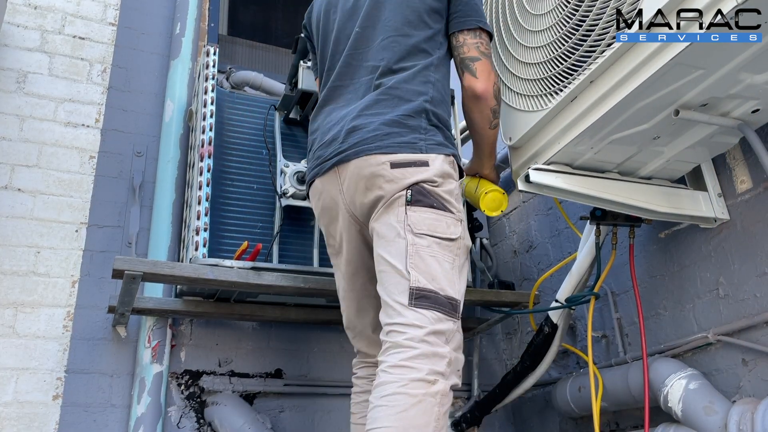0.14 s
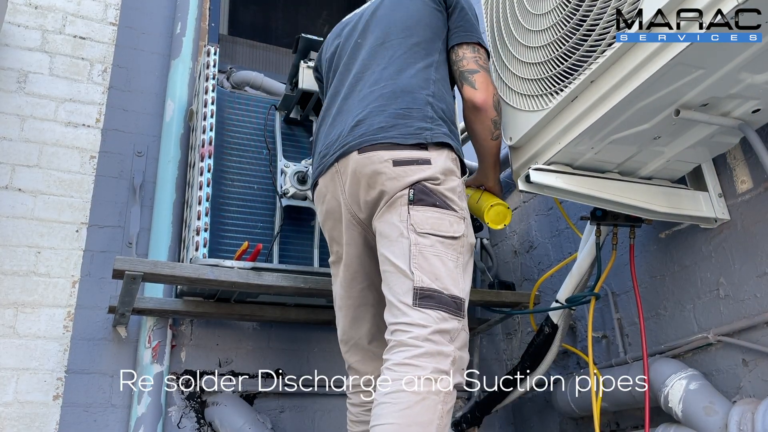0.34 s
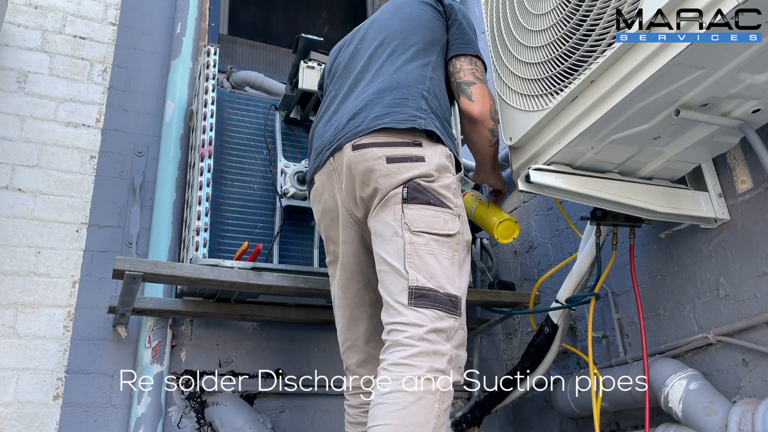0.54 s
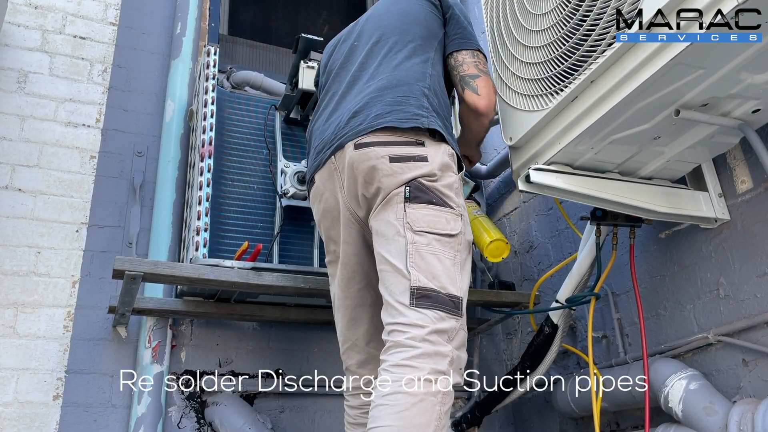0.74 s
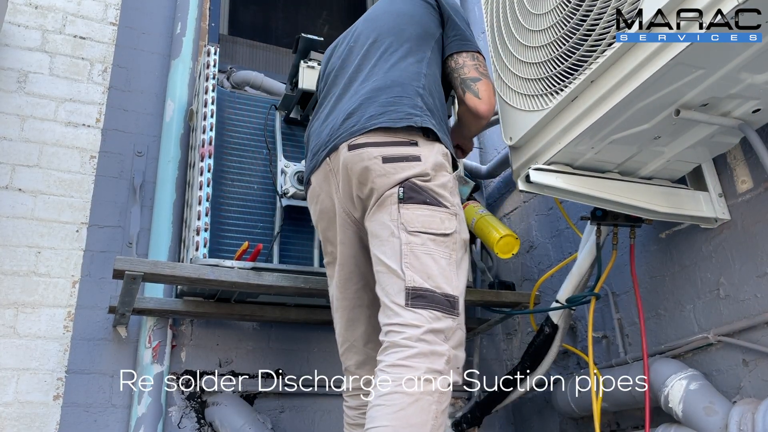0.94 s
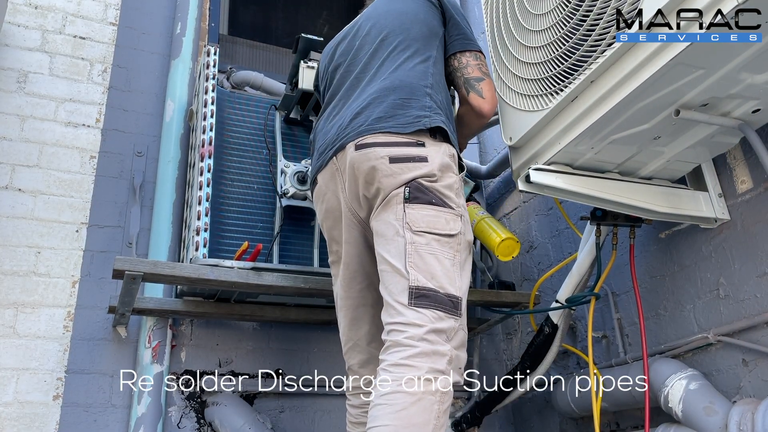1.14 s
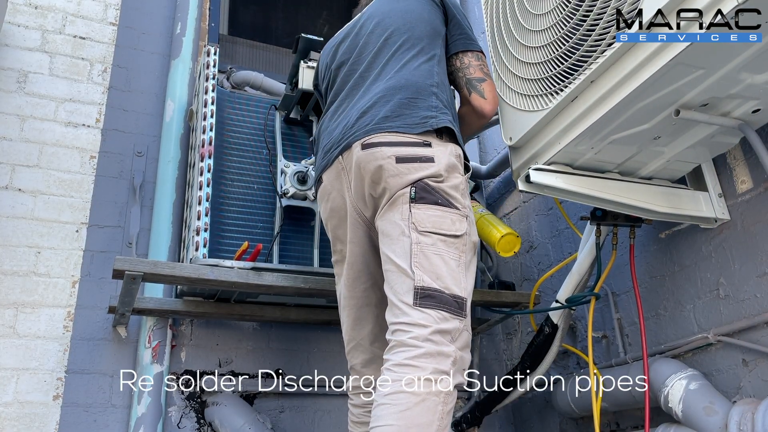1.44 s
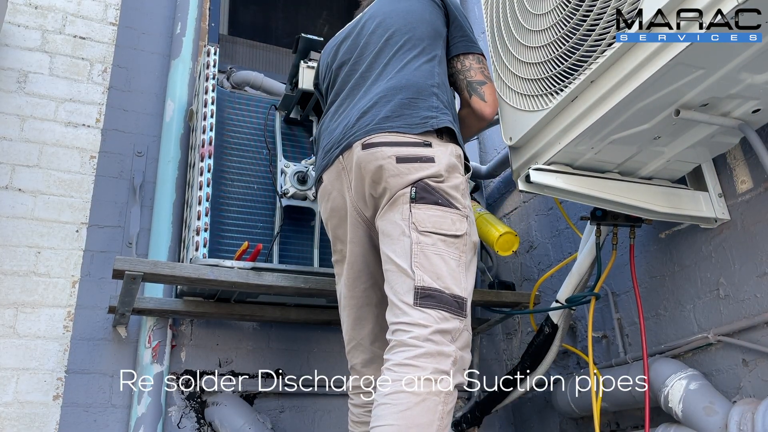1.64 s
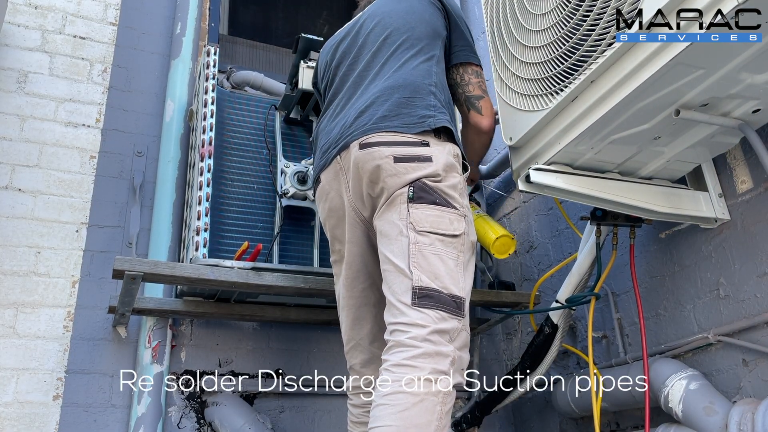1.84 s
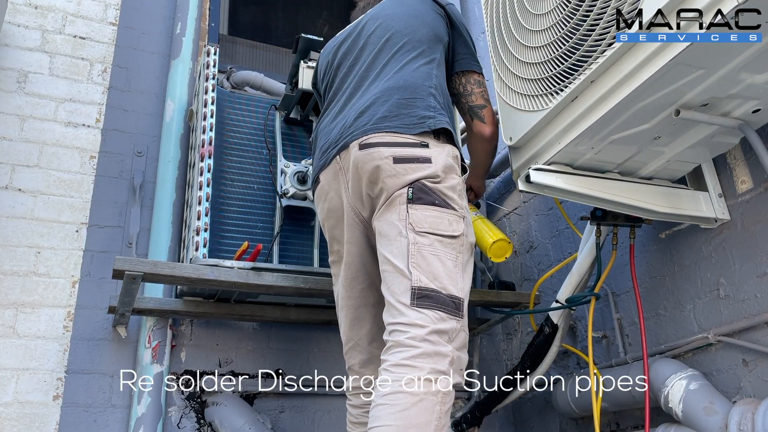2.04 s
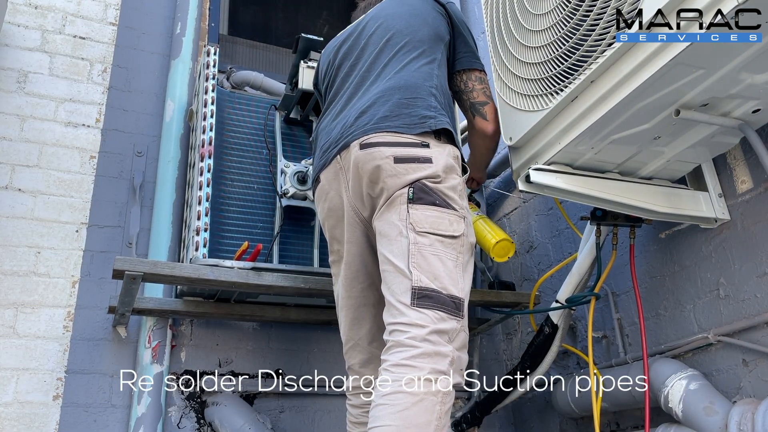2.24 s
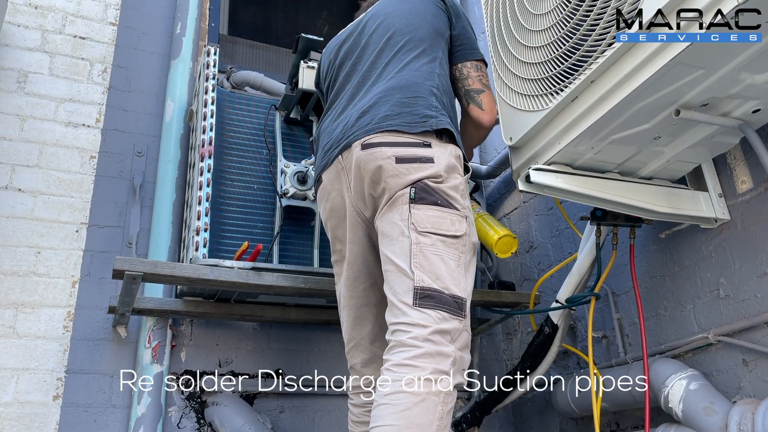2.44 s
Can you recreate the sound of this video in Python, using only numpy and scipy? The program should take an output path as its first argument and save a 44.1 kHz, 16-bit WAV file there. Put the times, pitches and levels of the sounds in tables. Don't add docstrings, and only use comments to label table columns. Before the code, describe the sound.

A handheld gas torch clacks, hisses, pops alight, cuts out, then relights to a steady roar.

```python
import sys
import numpy as np
from scipy import signal
from scipy.fft import rfft, irfft, next_fast_len
from scipy.io import wavfile
from scipy.ndimage import uniform_filter1d, map_coordinates

SR = 44100
rng = np.random.default_rng(int(sys.argv[2]) if len(sys.argv) > 2 else 0)


def nominal_scale(level):
    x = np.asarray(level, float) / 20
    return 10 ** x


def master(y):
    cut = np.clip(np.atleast_2d(y).T, -1, 1)
    pcm = np.round(cut * 32767)
    wavfile.write(sys.argv[1], SR, pcm.astype(np.int16))


N = 114660


def unit(x):
    return x / np.sqrt(np.mean(x ** 2) + 1e-20)


def along(points, hz):
    point_hz, values = np.transpose(points)
    return np.interp(np.log(hz + 1), np.log(point_hz + 1), values)


def curve(rows):
    return np.interp(np.arange(N) / SR, *np.transpose(rows))


def wobble(rate):
    knots = rng.standard_normal(int(N * rate / SR) + 4)
    return map_coordinates(knots, [np.arange(N) * rate / SR])


def filtered(x, response):
    size = next_fast_len(N + SR // 2)
    hz = np.fft.rfftfreq(size, 1 / SR)
    return irfft(rfft(x, size) * response(hz), size)[..., :N]


def rings(peaks, f, pitch=1):
    total = 0
    for k, (center, width, db) in enumerate(peaks):
        damping = 1j * f * width
        total = total + (-1) ** k * nominal_scale(db) * damping / ((pitch * center) ** 2 - f * f + damping)
    return total


# (frequency [Hz], turn [half cycles])
PORT_TURN = [(100, 0), (1500, -.35), (2300, 0), (5500, -.1), (7100, -1.), (11000, -2.), (14300, -3.),
             (15700, -3.2)]


def ports(x, other, shares, turned):
    def share(f):
        return np.clip(along(shares, f), 0, 1)

    def common(f):
        half_turn = np.pi / 2 * turned * along(PORT_TURN, f) * np.array([[1], [-1]])
        return np.sqrt(share(f)) * np.exp(1j * half_turn)

    return filtered(x, common) + filtered(other, lambda f: np.sqrt(1 - share(f)))


def rush(gain, shares, patchy_db, turned):
    grid = signal.stft(rng.standard_normal((3, N)), nperseg=512)[2]
    field = uniform_filter1d(rng.standard_normal(grid.shape[1:]), 5, 0)
    field = uniform_filter1d(field, 6, 1)
    noise = signal.istft(grid * nominal_scale(patchy_db * unit(field)), nperseg=512)[1][:, :N]
    return unit(filtered(ports(noise[0], noise[1:], shares, turned), gain))


# (time [s], level [dB])
BURN_LEVEL = [(1.336, -110), (1.343, -44.5), (1.36, -47), (1.585, -48), (1.63, -70.5), (1.662, -94),
              (1.676, -63), (1.69, -46), (1.81, -47), (1.836, -53.5), (1.86, -63.5), (1.93, -62),
              (1.996, -57), (2.045, -50), (2.1, -48), (2.6, -47.5)]
# (frequency [Hz], density [dB per Hz])
ROAR_COLOR = [(35, -22.5), (150, -6), (280, -15.5), (650, -13.5), (1000, -9.5), (2500, -20.5),
              (8000, -32.5), (12000, -45.5), (15700, -51)]
# (frequency [Hz], width [Hz], level [dB])
BURNER_TUBE = [(396, 16.7, 1.5), (816, 38, 1.45), (925, 35, -1.5), (1021, 41, 2.5), (1316, 43, 3),
               (1710, 63, 1), (2064, 30, 0.2), (2410, 55, -5), (2810, 120, -6.5), (3340, 100, -2.5),
               (3580, 50, 2.5), (4800, 140, -3), (7130, 95, 2.3)]
# (frequency [Hz], share [0-1])
FLAME_SHARE = [(100, 1), (400, 0.53), (2200, 0.6), (3300, 0.15), (4600, 0.68), (5700, 0.14), (7000, 0.99),
               (12000, 0.55)]


def flame():
    tube_db = 9.5

    def gain(f):
        tube = nominal_scale(tube_db) * abs(rings(BURNER_TUBE, f)) ** 1.1
        return nominal_scale(along(ROAR_COLOR, f)) * np.hypot(1, tube)

    flutter_db = 0.38 * wobble(14) + 0.92 * wobble(70) + 0.63 * wobble(300)
    return nominal_scale(curve(BURN_LEVEL) + flutter_db) * rush(gain, FLAME_SHARE, patchy_db=0.0, turned=True)


# (time [s], level [dB])
GAS_FLOW = [(.98, -111), (1.0, -87), (1.035, -67.5), (1.1, -67.5), (1.33, -67.5), (1.59, -78), (1.63, -88),
            (1.662, -107), (1.685, -70.5), (1.81, -71), (1.86, -72.5), (1.93, -73), (2.05, -71), (2.6, -69)]
# (frequency [Hz], level [dB])
JET_HISS = [(900, -46), (2400, -12), (4300, -10), (5600, -8), (7000, -9), (10000, -14), (12000, -18),
            (15700, -15)]
# (frequency [Hz], width [Hz], level [dB])
NOZZLE_MODES = [(1960, 260, -2), (2890, 98, 1), (3940, 250, -18), (4880, 160, 1), (5180, 350, -1.7),
                (6300, 300, 0), (7230, 350, -1.5), (8040, 130, -1.5), (9100, 400, -7.5)]
# (frequency [Hz], share [0-1])
JET_SHARE = [(100, .9), (2200, 0.6), (3300, 0.24), (4600, 0.46), (5700, 0.29), (7000, 0.75), (8000, .93),
             (12000, 0.69)]


def gas():
    lit_s, hot_pitch, whistle_db = 1.342, 1.26, 1.5

    def jet(pitch):
        def gain(f):
            whistle = nominal_scale(whistle_db) * abs(rings(NOZZLE_MODES, f, pitch)) ** 2
            return np.hypot(nominal_scale(along(JET_HISS, f)), whistle)
        return rush(gain, JET_SHARE, patchy_db=1.5, turned=True)

    cold, hot = jet(1), jet(hot_pitch)
    flow = nominal_scale(curve(GAS_FLOW) + 0.52 * wobble(10))
    return flow * np.where(np.arange(N) < lit_s * SR, cold, hot)


# (time [s], peak [dB], rattle length [s], pitch [factor], thump [dB])
KNOCK_EVENTS = [(.006, -54.5, 0.011, 0.62, -45), (0.052, -42, 0.0094, 0.93, -49.5),
                (0.101, -23, .009, 0.84, -36), (0.112, -26, 0.011, 0.51, -33),
                (0.156, -26.5, 0.0037, 1.32, -55), (.162, -16, 0.0033, 1.014, -48),
                (0.169, -28, .01, .9, -49), (.188, -39, .01, 0.64, -46.5), (0.238, -37.5, .006, 0.67, -45),
                (0.298, -50.5, .01, 0.53, -49), (0.927, -25.5, 0.0054, 0.956, -62),
                (0.933, -20, 0.0057, 1.033, -46.5), (0.944, -31.5, 0.0038, 1.03, -63),
                (.978, -55, 0.019, 0.66, -62), (1.347, -43, 0.0045, 1.06, -46.5)]
# (frequency [Hz], width [Hz], level [dB])
CASING_MODES = [(470, 160, -13), (725, 80, -4), (1105, 90, 2.5), (1450, 200, -7), (2050, 300, -16),
                (2900, 500, -25)]
# (frequency [Hz], level [dB])
CONTACT_CRACK = [(150, -22), (400, -25), (1000, -17), (2500, -28), (6000, -42), (7500, -45.5),
                 (10000, -55.5), (15000, -69.5)]


def knocks():
    thump_hz, thump_width_hz, thump_dull_hz = 105, 48.6, 250
    casing_dull_hz = 2680

    def thump(f):
        return rings([(thump_hz, thump_width_hz, 0)], f) / (1 + 1j * f / thump_dull_hz) ** 2

    out = np.zeros(N)
    draws = rng.random((len(KNOCK_EVENTS), 3, 40))
    for (start, peak_db, length, pitch, thump_db), (when, weak, side) in zip(KNOCK_EVENTS, draws):
        def casing(f):
            ringing = rings(CASING_MODES, f, pitch) / (1 + 1j * f / casing_dull_hz) ** 2
            return ringing + nominal_scale(along(CONTACT_CRACK, f))

        hits = np.zeros(N)
        at = np.round((start + 2 * length * when) * SR).astype(int)
        swell = np.minimum(when / 0.12, 1)
        np.add.at(hits, at, swell * nominal_scale(-12 * when - 8.7 * weak) * np.sign(side - 0.5))
        tones = rfft(hits)
        power = uniform_filter1d(abs(tones) ** 2, size=260)
        hits = irfft(tones / np.sqrt(abs(power) + 1e-9), N)
        rattle = filtered(hits, casing)
        out += nominal_scale(peak_db) * rattle / abs(rattle).max()

        push = np.zeros(N)
        push[round((start + length / 2) * SR)] = nominal_scale(thump_db + 52.5)
        out += filtered(push, thump)
    return out


# (frequency [Hz], time to fall 60 dB [s])
YARD_DECAY = [(150, 0.5), (1000, 0.25), (4000, 0.35), (10000, 0.19)]
# (frequency [Hz], share [0-1])
FAR_SHARE = [(60, .93), (180, 0.84), (310, 0.44), (600, 0.25), (9000, 0.16)]


def yard(x):
    delay = 150
    hz, t, grid = signal.stft(rng.standard_normal((3, SR // 2)), SR, nperseg=256)
    decay_db = -60 * t / along(YARD_DECAY, hz)[:, None]
    tail = signal.istft(grid * nominal_scale(decay_db), SR, nperseg=256)[1]
    tail = tail / np.linalg.norm(tail[0])
    wet = signal.fftconvolve(np.pad(x, (delay, 0))[None], tail, axes=1)[:, :N]
    return ports(wet[0], wet[1:], FAR_SHARE, turned=True)


# (time [s], level [dB])
STIR_LEVEL = [
    (0, -44),
    (.05, -53),
    (.12, -55),
    (.22, -61),
    (.25, -49.5),
    (.3, -55),
    (.36, -63),
    (.45, -100),
]
# (frequency [Hz], level [dB])
SCUFF_COLOR = [(25, -3.5), (100, -4.7), (250, -9.5), (500, -19), (1000, -23), (3000, -44), (7000, -59),
               (15000, -62)]


def stirring():
    scuff = rush(lambda f: nominal_scale(along(SCUFF_COLOR, f)), FAR_SHARE, patchy_db=3.0, turned=False)
    return nominal_scale(curve(STIR_LEVEL) + 2.5 * wobble(30)) * scuff


# (frequency [Hz], width [Hz], level [dB])
WHINE_BANDS = [(6000, 150, -108), (9000, 330, -97), (11990, 90, -95)]


def whines():
    out = np.zeros((2, N))
    for center, width, db in WHINE_BANDS:
        noise = rng.standard_normal((2, N))
        out += nominal_scale(db) * unit(filtered(noise, lambda f: np.exp(-((f - center) / width) ** 2)))
    return out


# (frequency [Hz], density [dB per Hz])
RUMBLE_COLOR = [(20, -25.5), (55, -9), (123, -9), (210, -14.5), (500, -28.5), (1000, -31), (4500, -61),
                (15700, -80)]


def rumble():
    level_db, sway_db = -60.5, 0.7
    far = rush(lambda f: nominal_scale(along(RUMBLE_COLOR, f)), FAR_SHARE, patchy_db=1.0, turned=False)
    return nominal_scale(level_db + sway_db * wobble(7.9)) * far


def scene():
    blows = knocks()
    side_db = [[-1.1], [1.1]]
    near = ports(blows, np.zeros((2, N)), [(100, 0.64)], turned=True) * nominal_scale(side_db)
    walls = nominal_scale(-16.5) * yard(blows)
    return flame() + gas() + near + walls + stirring() + whines() + rumble()


def roll_off(x):
    return signal.sosfilt(signal.butter(12, 15720, fs=SR, output="sos"), x)


def record(dry):
    return roll_off(dry)


dry = scene()
out = record(dry)
master(out)
```